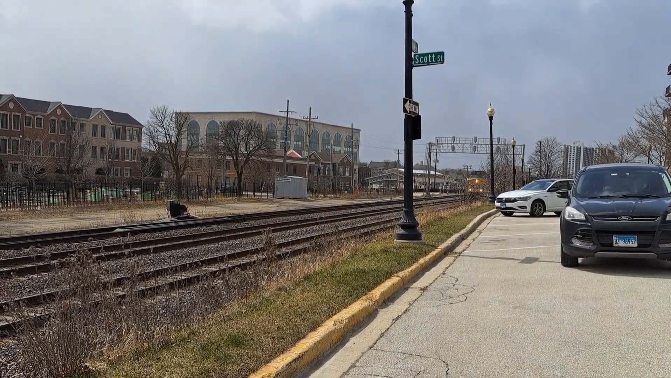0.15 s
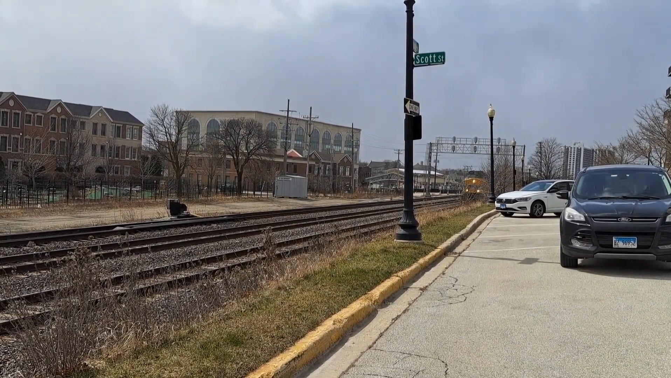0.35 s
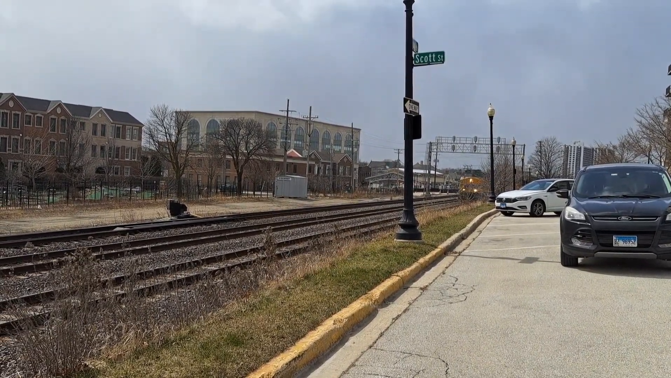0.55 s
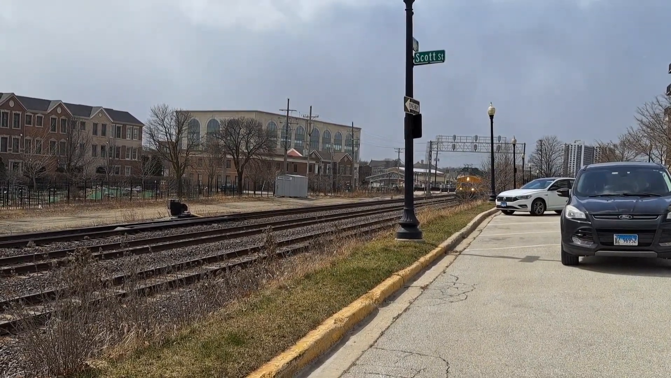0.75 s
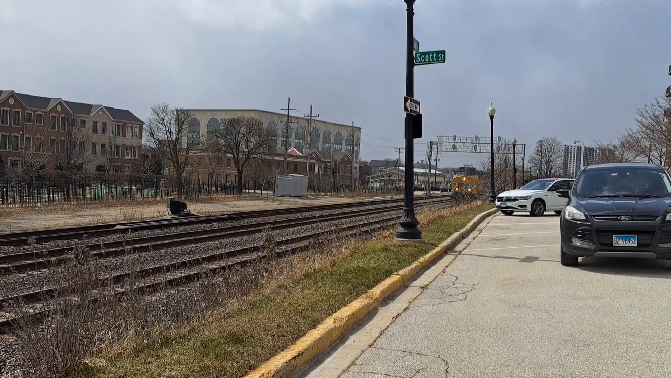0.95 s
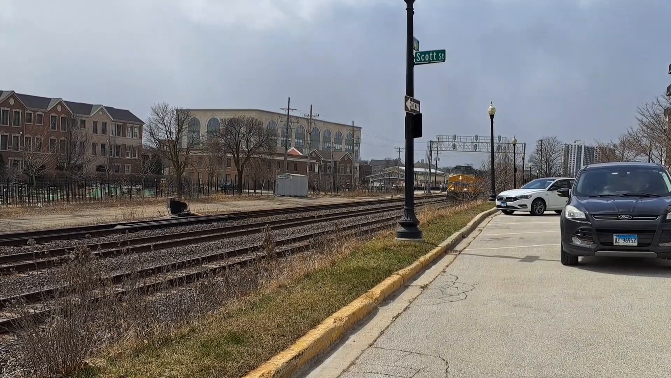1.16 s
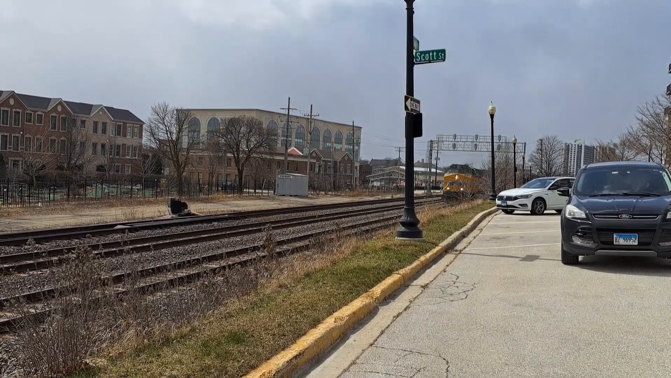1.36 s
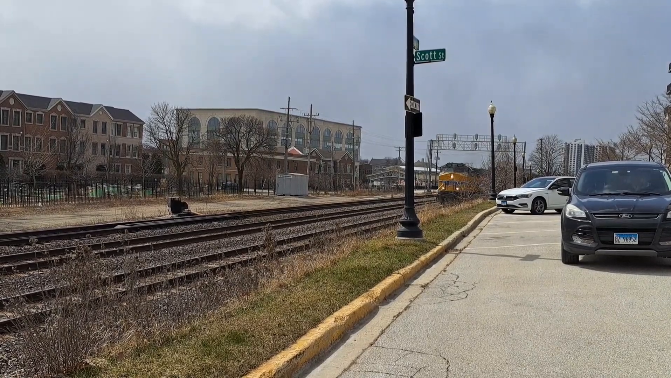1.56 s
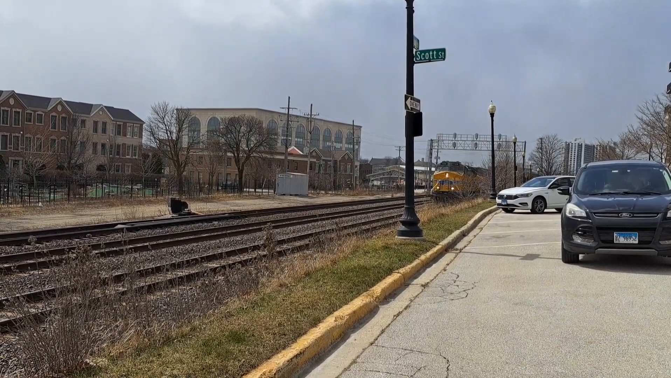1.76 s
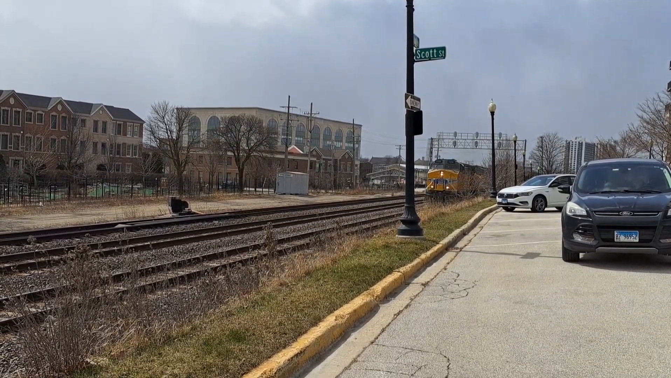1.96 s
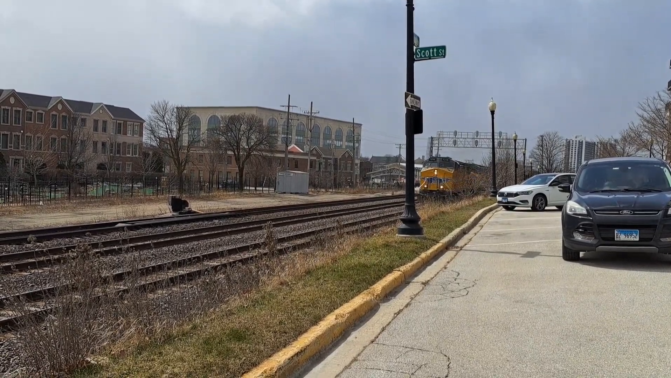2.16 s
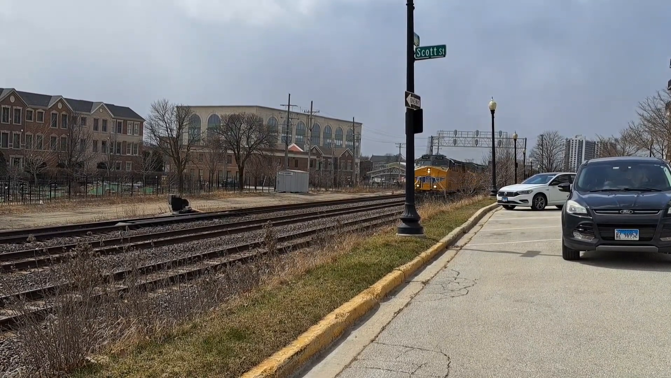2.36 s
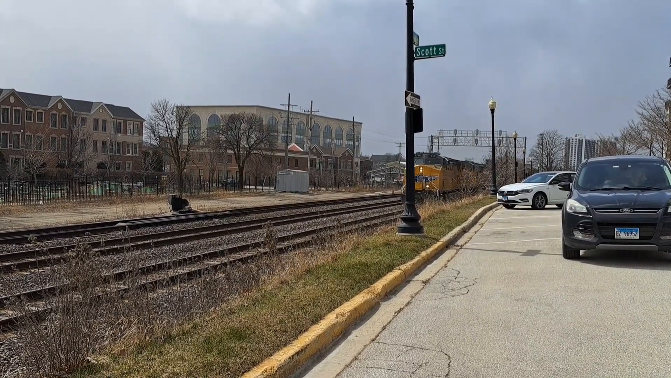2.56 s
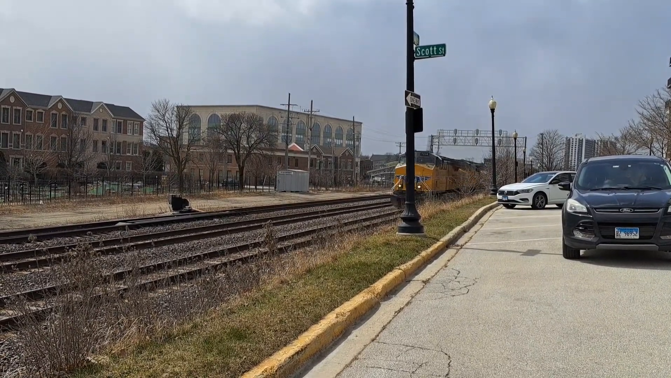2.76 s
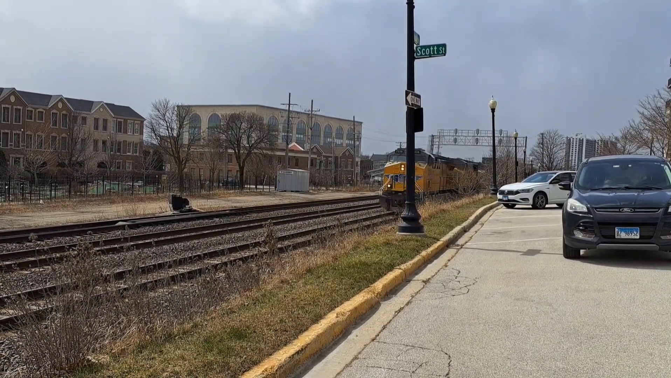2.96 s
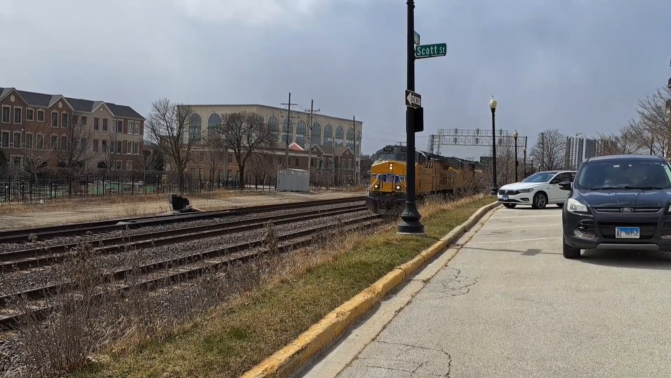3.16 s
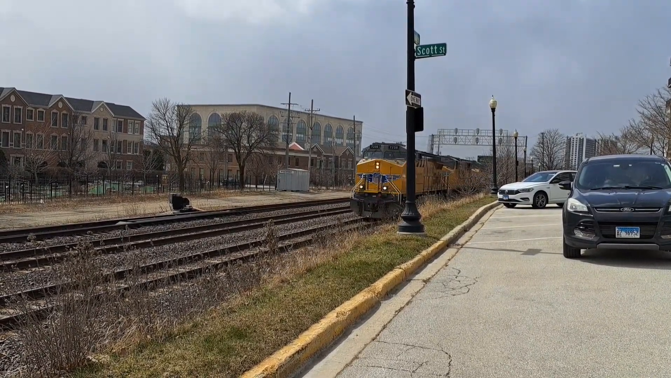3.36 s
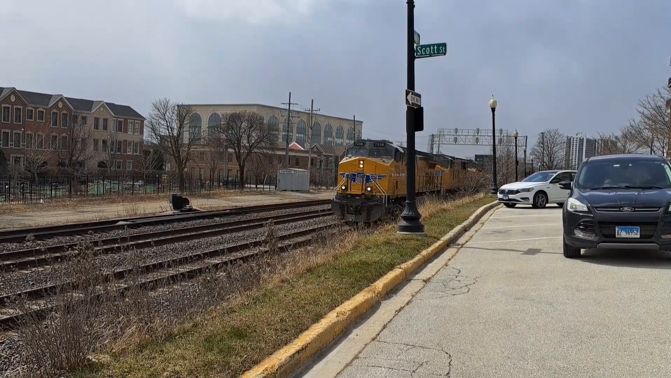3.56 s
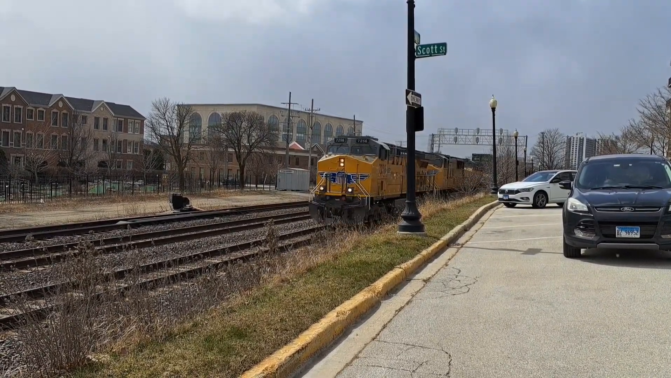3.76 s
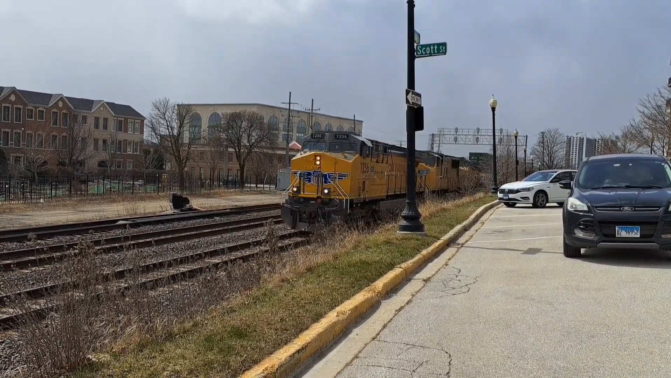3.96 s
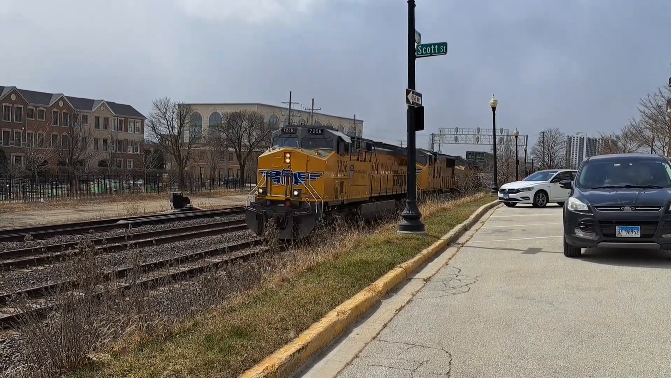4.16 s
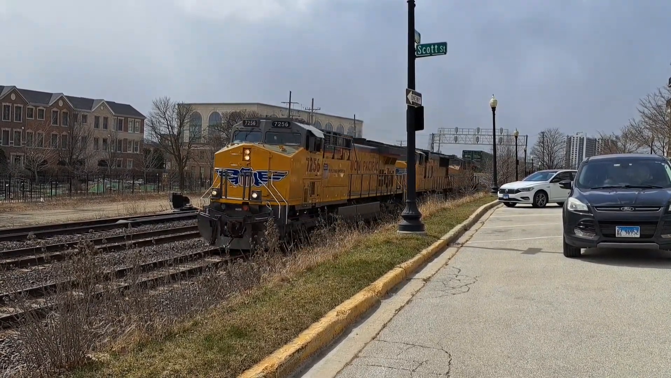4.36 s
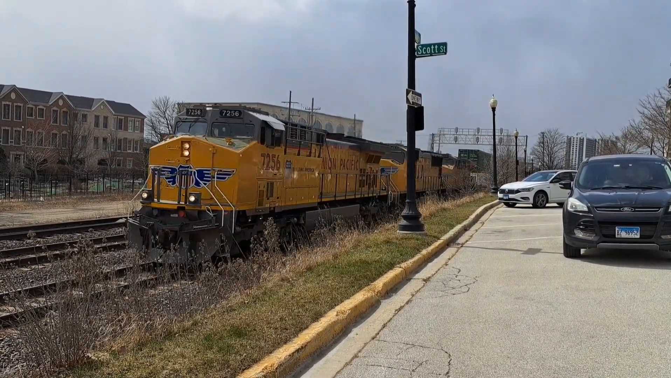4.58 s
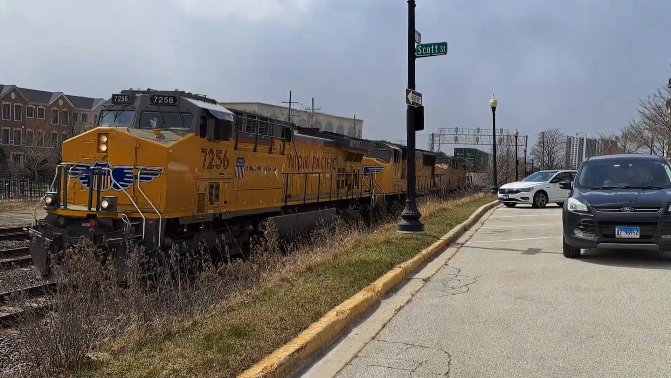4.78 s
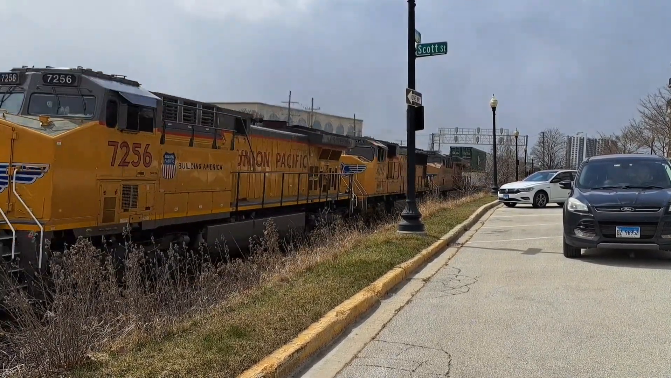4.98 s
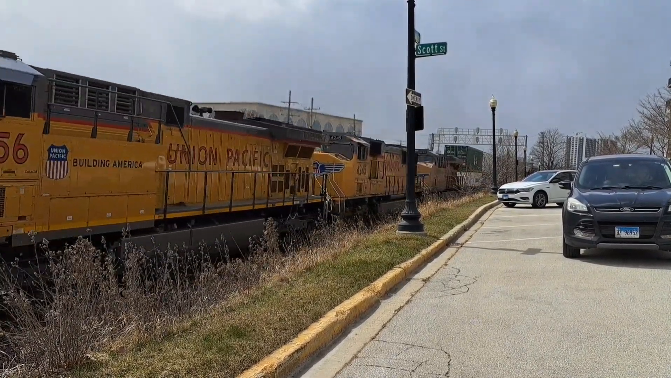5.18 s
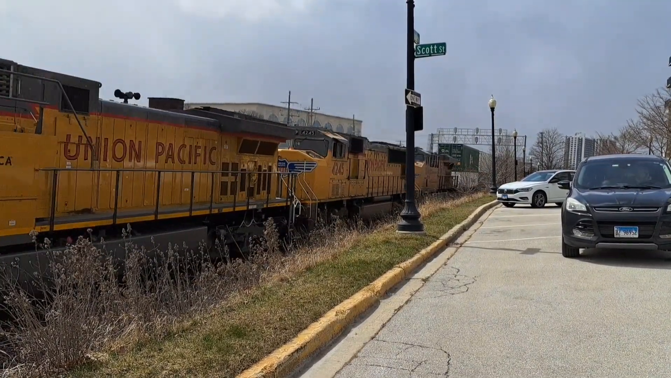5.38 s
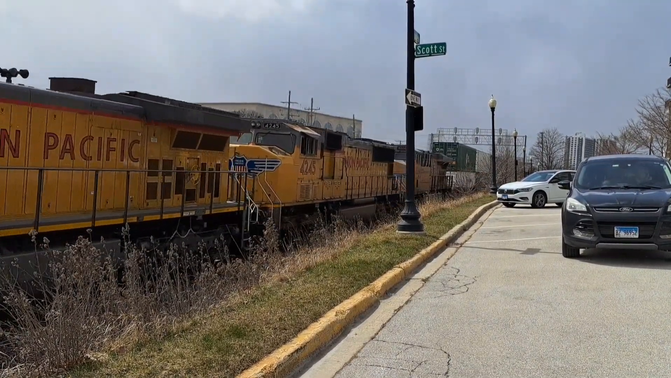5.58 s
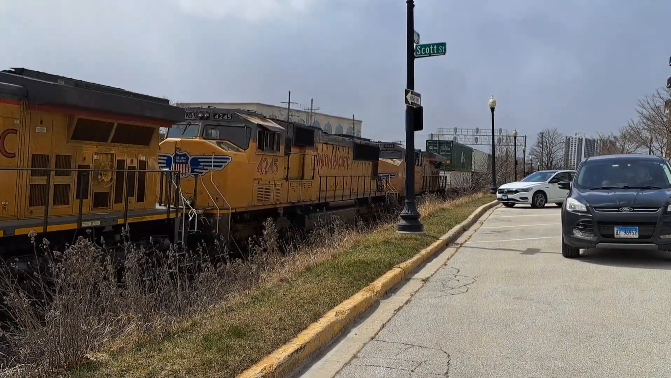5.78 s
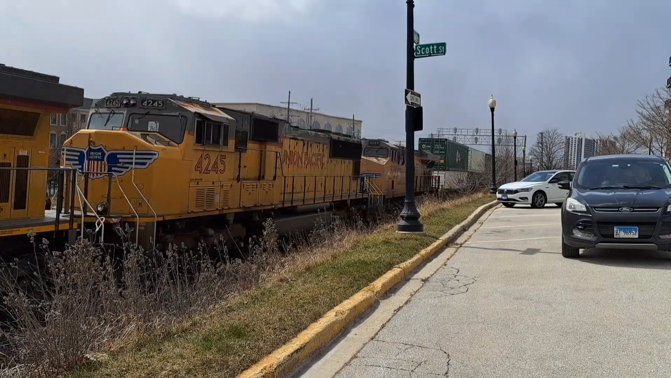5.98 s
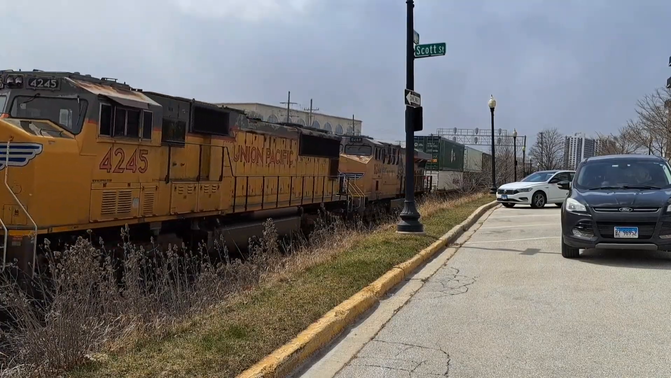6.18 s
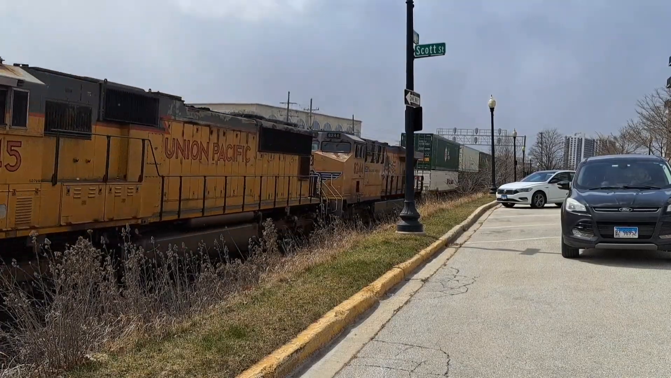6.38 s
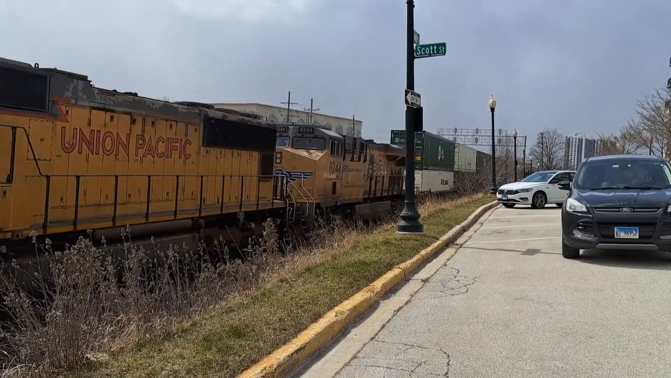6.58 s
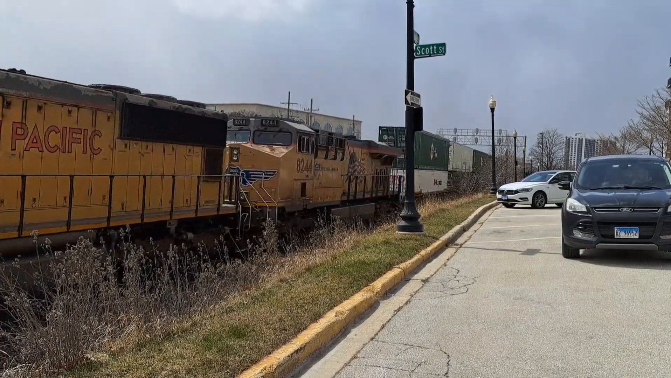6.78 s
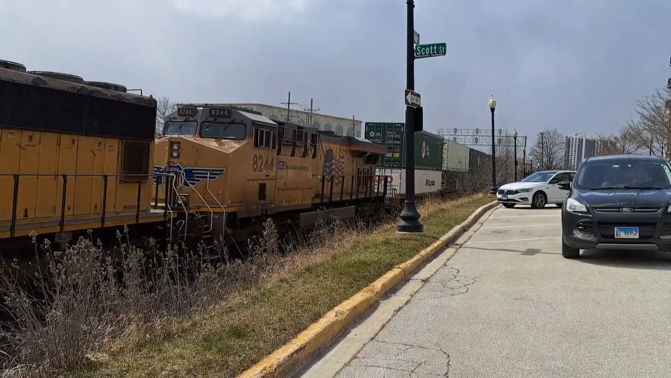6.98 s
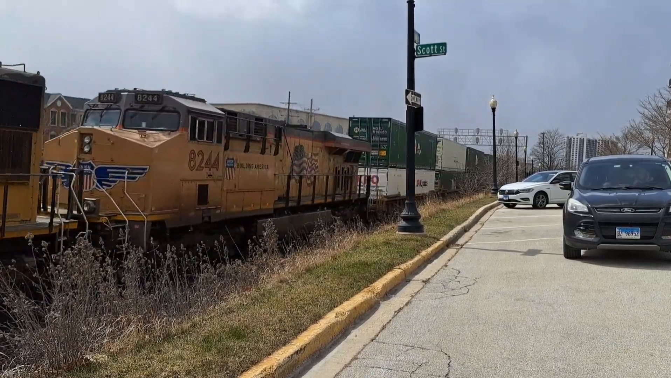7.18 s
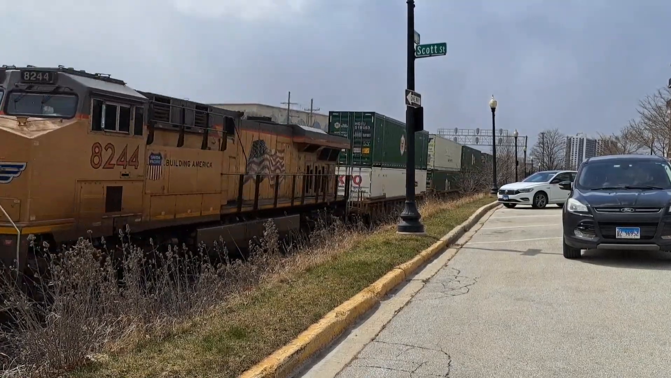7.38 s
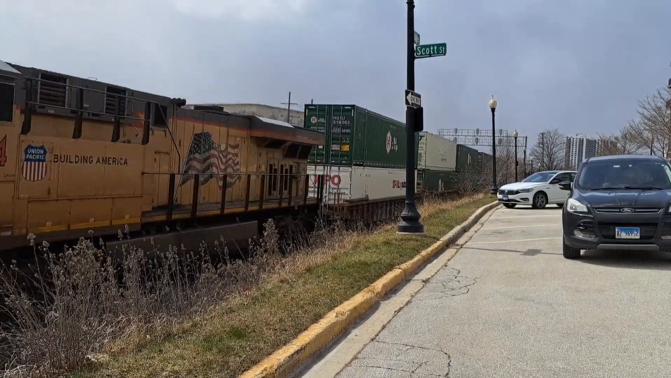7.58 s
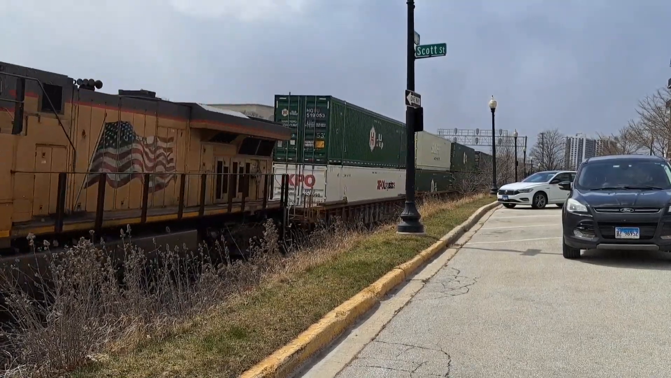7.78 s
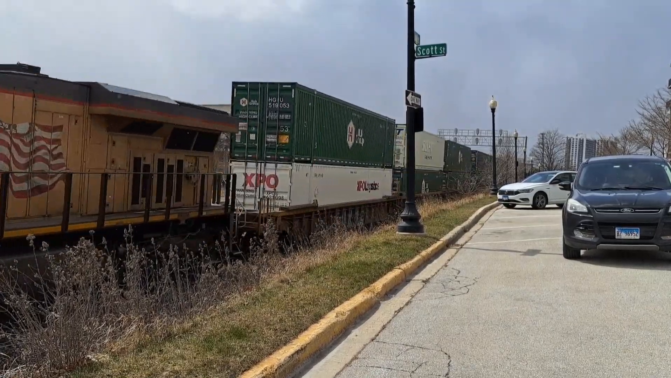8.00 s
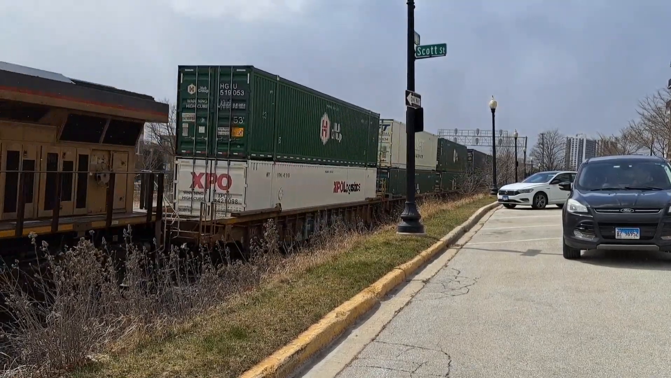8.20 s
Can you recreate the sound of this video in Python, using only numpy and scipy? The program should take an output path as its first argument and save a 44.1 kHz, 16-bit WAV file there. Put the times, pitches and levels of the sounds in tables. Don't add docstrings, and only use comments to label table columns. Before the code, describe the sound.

Gusty wind thuds on the microphone while a distant engine throb grows, then diesel locomotives roar past close by with whining gears and singing wheels.

```python
import sys
import numpy as np
from scipy import signal
from scipy.fft import rfft, irfft, next_fast_len
from scipy.io import wavfile
from scipy.ndimage import uniform_filter1d, map_coordinates

SR = 44100
rng = np.random.default_rng(int(sys.argv[2]) if len(sys.argv) > 2 else 0)


def put_to_file(sound):
    columns = np.atleast_2d(sound).T
    safe = np.clip(columns, -1, 1)
    whole_steps = np.round(safe * 32767)
    wavfile.write(sys.argv[1], SR, whole_steps.astype(np.int16))


def nominal_scale(level):
    x = np.asarray(level, float) / 20
    return 10 ** x


N = 363384
STEP = 40
TIME_S = np.arange(N) / SR
SLOW_TIME_S = np.arange(0, N, STEP) / SR
SPEED_MACH = 0.075
MISS_S = 0.8


def in_time(rows):
    s, *columns = np.transpose(rows)
    return [np.interp(TIME_S, s, column) for column in columns]


def at_hz(points, hz):
    point_hz, value = np.array(points).T
    return np.interp(np.log(hz), np.log(point_hz), value)


def every_sample(x):
    return np.interp(np.arange(N) / STEP, np.arange(len(x)), x)


def slow(rate):
    r = np.exp(-2 * STEP * np.pi * rate / SR)
    settle = 2000
    wander = signal.lfilter([1], [1, -2 * r, r * r], rng.standard_normal(N // STEP + 2 + settle))
    return rms_one(wander[settle:])[:-1]


def drift(rate):
    return every_sample(slow(rate))


def swell(s, length):
    t = np.arange(0, N + STEP, STEP) / SR
    return np.exp(-(2 * (t - s) / length) ** 2)


def rms_one(x):
    return x / np.sqrt(np.mean(x ** 2) + 1e-20)


def band(x, low_hz, high_hz):
    return signal.sosfilt(signal.butter(2, [low_hz, high_hz], "band", fs=SR, output="sos"), x)


def low_pass(order, edge_hz):
    return signal.butter(order, edge_hz, fs=SR, output="sos")


def pair(mid, side, hz):
    # pitch_hz, likeness (0 to 1)
    likeness = [(40, 0.75), (80, 0.94), (300, 0.97), (700, 0.66), (1200, 0.67), (2900, 0.43), (5000, 0.18),
                (15000, 0.06)]
    alike = np.clip(at_hz(likeness, hz), 0, 1)
    return np.sqrt(1 + alike) * mid + np.sqrt(1 - alike) * side * [[1], [-1]]


def port_gains(level_db, left_right_db):
    return nominal_scale(level_db + left_right_db * np.array([[0.5], [-0.5]]))


def guard_db():
    # middle_s, width_s, depth_db
    dips = [
        [(0.708, 0.027, 20), (0.857, 0.073, 19.5), (1.62, 0.014, 9), (1.931, 0.029, 19), (2.052, 0.04, 16),
         (2.803, 0.021, 36), (4.359, 0.02, 21)],
        [(0.204, 0.062, 34), (0.475, 0.039, 10), (0.572, 0.019, 22), (0.671, 0.018, 12), (0.958, 0.12, 16),
         (1.041, 0.018, 10), (1.427, 0.039, 20), (1.526, 0.018, 19), (1.621, 0.02, 23), (2.064, 0.081, 12),
         (2.727, 0.018, 19), (2.831, 0.076, 21), (2.907, 0.034, 24), (2.975, 0.057, 29), (3.07, 0.084, 19),
         (3.265, 0.049, 24), (3.31, 0.021, 24), (3.606, 0.075, 27), (3.719, 0.07, 19), (3.937, 0.058, 30),
         (4.362, 0.014, 15)],
    ]
    cut_db = np.zeros((2, N))
    for port, rows in enumerate(dips):
        for s, width, depth in rows:
            near = np.arange(max(round((s - width) * SR), 0), round((s + width) * SR))
            cut_db[port, near] -= depth * np.exp(-(2 * (near / SR - s) / width) ** 4)
    return cut_db


def wind():
    # middle_s, length_s, level_db, left_right_db
    gust_rows = [(0.158, 0.2, -26, -1), (0.469, 0.2, -15.5, 4), (0.637, 0.04, -20.5, 3),
                 (0.792, 0.037, -39, 8), (0.97, 0.22, -23, 5.5), (1.205, 0.22, -41, -1),
                 (1.458, 0.1, -23, -4), (2.3, 0.46, -37.5, -6), (2.746, 0.18, -27.5, -2),
                 (2.883, 0.09, -28, -10), (3.35, 0.17, -34, -4), (3.582, 0.21, -35, -19),
                 (3.85, 0.094, -29.5, -7), (4.114, 0.16, -39, -4.5)]
    gusts = sum(port_gains(db, pan_db) * swell(s, length) for s, length, db, pan_db in gust_rows)
    breeze = np.clip((5.04 - TIME_S) / 0.44, 0, 1)
    working_db = uniform_filter1d(np.minimum(-guard_db(), 20), round(0.1 * SR))
    lumps = nominal_scale(4.0 * np.array([drift(40.0), drift(38.0)]))
    grit = nominal_scale(3 * np.array([drift(60.0), drift(60.0)]))
    white = rng.standard_normal((2, N)) + 0.39 * rng.standard_normal(N)
    thuds = rms_one(band(band(white * lumps, 25, 244), 40, 1040)) * nominal_scale(0.5)
    thuds = thuds * (nominal_scale(-30) * breeze + [every_sample(gust) for gust in gusts])
    rustle = rms_one(band(band(white * grit, 464, 880), 440, 1620)) * nominal_scale(-50.5 + 1.29 * working_db)
    return thuds + rustle * breeze


def ticks():
    # start_s, peak_db, left_right_db
    scuffs = [(0.388, -34, 0.5), (0.438, -25, -6), (0.463, -15.5, -12), (0.624, -26.5, -8),
              (0.853, -26, -1.5), (0.949, -26, -3), (1.195, -37, 2.0), (1.436, -30, -4.0),
              (1.706, -34, -0.5), (2.007, -24.5, -8), (2.372, -27, -1.5), (2.538, -23, -0.5),
              (2.704, -26, -14), (2.79, -21, -6.0), (2.818, -21, -16), (2.863, -24, -8.0),
              (2.901, -25, -4.0), (3.08, -26, -8.0), (3.104, -23, -3.5), (3.143, -29, -7.0),
              (3.157, -29, 0), (3.314, -31, -6.5), (3.647, -34, -2.0), (3.91, -25, -15), (3.933, -36, -4.5)]
    size = 2048
    out, t = np.zeros((2, N + size)), np.arange(size) / SR
    for s, peak_db, pan_db in scuffs:
        grit = rng.standard_normal(size) * (1 - np.exp(-t / 0.00082)) * np.exp(-t / 0.002)
        tick = band(band(grit, 420, 1080), 320, 2200)
        i = round(s * SR)
        out[:, i:i + size] += tick / np.abs(tick).max() * port_gains(peak_db - 2, pan_db)
    return out[:, :N]


def membrane(t, hz, cycles, phase=0):
    age = t * hz / cycles
    return np.sin(2 * np.pi * hz * t + phase) * age * np.exp(1 - age)


def thumps():
    # start_s, peak_db, pitch_hz
    eddies = [(0.412, -10, 171), (0.526, -12.5, 149), (0.776, -19, 95), (0.798, -13.5, 85.4),
              (0.893, -19, 170), (1.178, -13, 120), (1.24, -14, 141), (1.487, -12, 194), (2.155, -19, 181),
              (2.768, -8, 95), (2.876, -14.5, 140), (2.933, -12, 105), (3.13, -19, 80), (3.186, -14.5, 90),
              (3.677, -15, 75), (3.772, -17, 84), (3.8, -11, 101), (3.88, -13, 90), (4.036, -20.5, 270),
              (4.077, -11.5, 89.5), (4.195, -15, 210)]
    size = 4096
    out, t = np.zeros(N + size), np.arange(size) / SR
    for s, peak_db, hz in eddies:
        i = round(s * SR)
        out[i:i + size] -= nominal_scale(peak_db) * membrane(t, hz, cycles=0.53)
    return out[:N]


def buffets():
    # start_s, peak_db, left_right_db, crack_db
    hits = [(0.418, -17, -6.5, -40), (0.438, -16, -8.5, -26),
            (0.464, -26, -8, -17) , (0.504, -8.5, -2, -50), (0.513, -17, -7, -45), (0.528, -15, -3.5, -36),
            (0.548, -14.5, 3.5, -45), (0.617, -11.5, -8, -44), (0.624, -20, -7.5, -22),
            (0.639, -17, 9, -44), (0.854, -19, -6.5, -34), (0.918, -20, -13, -9.5), (0.951, -18, 9, -32),
            (0.988, -19, 9, -45), (1.193, -32, 2, -29), (1.4, -16.5, -5.5, -27), (1.436, -20.5, -12, -35),
            (1.708, -31, -1.0, -17), (1.858, -30, 3.5, -10), (2.372, -31, -3.5, -24),
            (2.815, -17, -10.5, -17), (2.876, -15, -2, -32), (2.949, -20, -11.5, -20),
            (3.142, -33, 0.5, -24), (3.304, -23, -9.5, -27)]
    size = 2048
    out, t = np.zeros((2, N + size)), np.arange(size) / SR
    for s, peak_db, pan_db, crack_db in hits:
        hz = 197 + 20 * abs(pan_db)
        rock = membrane(t, hz, cycles=0.61, phase=np.pi + rng.uniform(-1.0, 0.61, (2, 1)))
        crack = band(rng.standard_normal((1, size)) * t * np.exp(-t / 0.0019), 650, 2800)
        crack = signal.lfilter([1], [1, -0.9], crack)
        crack = crack / np.abs(crack).max(axis=1, keepdims=True)
        i = round(s * SR)
        out[:, i:i + size] += (rock + nominal_scale(crack_db + 5.5) * crack) * port_gains(peak_db + 0.5, pan_db)
    return out[:, :N]


def roar():
    handover_hz = (140, 1150, 8000)
    # pitch_hz, level_db (per Hz)
    near_colour = [(21, -40), (35, -26), (61, -0.5), (97, -0.5), (166, -13.5), (220, -13.5), (307, -16.5),
                   (474, -22.5), (661, -26.5), (969, -32.5), (1190, -39), (1840, -38.5), (2760, -43),
                   (8080, -47), (15700, -50.5)]
    # pitch_hz, level_db (per Hz)
    far_colour = [(21, -37), (35, 3.5), (60, 2.5), (90, -4), (166, -6), (512, -21.5), (811, -14.5),
                  (994, -19.5), (1320, -35), (1880, -37), (2760, -53.5), (4270, -49), (10200, -66),
                  (14500, -62), (15700, -76)]
    # time_s, nearness (0 far to 1 close)
    nearness = [(0, 0.015), (4.2, 0.37), (4.9, 0.77), (5.4, 0.81), (8.24, 0.97)]
    # time_s, level_db
    loudness = [(0.0, -44.5), (0.27, -49), (0.6, -56), (1.1, -54.5), (2.02, -51.5), (2.61, -44.5),
                (3.26, -48), (4.08, -45), (4.36, -40.5), (4.6, -38), (4.8, -35), (5.1, -32), (5.51, -30.5),
                (6.56, -31.5), (6.82, -33), (7.14, -33.5), (7.41, -36.5), (8.24, -35)]
    # abreast_db, share of the loudness swing, gained_db from far to close
    part_rows = [
        (-19, 0.3, -2.5),
        (-22.5, 0.79, 0.85),
        (-27.5, 0.86, 0.42),
        (-35.5, 1.46, -3.5),
    ]
    trims_db = (-1.5, 0.1, -1.5, 0.1)

    near = np.clip(in_time(nearness)[0], 0, 1)
    swing_db = in_time(loudness)[0] + 31
    parts, power = np.zeros((4, 2, N)), np.zeros((4, N))
    white = rng.standard_normal((2, 2, N))
    together = 1 + 0.14 * drift(63.0)
    edges = 35 * 2 ** np.arange(0, 9.1, 0.5)
    for k, (low, high) in enumerate(zip(edges, edges[1:])):
        hz = np.sqrt(low * high)
        part = np.searchsorted(handover_hz, hz)
        gain = near * nominal_scale(at_hz(near_colour, hz)) + (1 - near) * nominal_scale(at_hz(far_colour, hz))
        power[part] += gain ** 2 * (high - low) * 4 / SR
        flicker = together + 0.18 * drift(16.2)
        parts[part] += gain * flicker * pair(*band(white[k % 2], low, high), hz)
    out = np.zeros((2, N))
    for k, (abreast_db, share, gained_db) in enumerate(part_rows):
        level_db = abreast_db + share * swing_db + gained_db * near
        out += nominal_scale(level_db + trims_db[k]) * parts[k] / np.sqrt(power[k])
    return out


def noise_swells(rows):
    out = np.zeros((2, N))
    for s, length, hz, width_hz, level_db in rows:
        size = round(2 * length * SR)
        white = rng.standard_normal((2, 2 * SR))[:, :size]
        noise = pair(*band(white, hz - width_hz / 2, hz + width_hz / 2), hz)
        i = max(round(s * SR) - size // 2, 0)
        out[:, i:i + size] += (nominal_scale(level_db) * rms_one(noise) * np.hanning(size))[:, :N - i]
    return out


def squeals():
    # middle_s, length_s, pitch_hz, width_hz, level_db
    rows = [(.19, 0.25, 10000, 8000, -55.5), (0.75, .5, 11300, 300, -68), (2.45, .5, 11300, 300, -66),
            (.09, .1, 14500, 300, -66), (1.8, .15, 14500, 200, -69), (4.3, .08, 14500, 250, -60),
            (4.5, .06, 14800, 400, -59), (5.26, 0.14, 161, 27, -27), (6.53, .12, 157, 31, -25.5),
            (5.64, .04, 6000, 500, -44), (7.9, .05, 3400, 400, -45), (5.53, 0.16, 2580, 210, -38),
            (1.19, .012, 12000, 5000, -50), (1.85, .2, 11300, 300, -62), (3.69, .25, 14500, 200, -60),
            (4.25, 0.5, 4600, 850, -48.5), (4.621, .1, 15500, 403, -54), (4.71, 0.09, 5360, 300, -38),
            (4.85, 0.3, 3000, 2500, -36), (4.95, 0.22, 1950, 260, -41), (5.447, .4, 756, 230, -30),
            (6.499, 0.46, 3450, 530, -40), (4.803, 0.04, 6100, 3300, -33.5), (6.73, 0.11, 8650, 210, -35.5),
            (1.6, .42, 1780, 270, -52), (2.25, .42, 1850, 350, -48.5), (8.19, 0.09, 7900, 300, -35.5),
            (4.28, 0.3, 1660, 24, -42), (7.15, 0.04, 6750, 600, -44), (7.36, 0.28, 5280, 240, -43),
            (7.9, 0.098, 4900, 520, -48), (4.9, 0.35, 1180, 130, -36.5), (7.7, 0.1, 2900, 200, -44)]
    return noise_swells(rows)


def grinds():
    # middle_s, length_s, pitch_hz, width_hz, level_db
    rows = [(0.921, .006, 3300, 3200, -47), (3.851, .4, 1950, 300, -51), (4.93, .14, 98, 30, -20),
            (5.703, 0.36, 2040, 260, -48), (6.448, 0.4, 1960, 240, -40.5), (7.141, 0.089, 2220, 600, -33.5),
            (7.2, 0.09, 2630, 700, -30), (7.3, 0.067, 2400, 500, -33), (7.18, 0.057, 4200, 500, -37),
            (4.72, 0.095, 2670, 700, -37.5), (4.9, 0.16, 2020, 250, -36.5), (5.4, 0.41, 1850, 120, -40),
            (5.7, .15, 1490, 90, -40), (6.0, 0.15, 1450, 70, -44), (6.6, 0.25, 3700, 700, -39),
            (7.12, .2, 8330, 300, -40), (5.95, 0.28, 310, 89, -29.5), (8.12, .1, 195, 40, -28.5)]
    return noise_swells(rows)


def whines():
    # middle_s, length_s, pitch_hz, width_hz, level_db
    rows = [(0.464, .006, 3300, 2500, -46), (4.35, .3, 1570, 30, -46), (4.68, .18, 1370, 30, -42),
            (4.7, .2, 1860, 30, -41), (5.25, .25, 1230, 260, -39), (5.35, .25, 1450, 300, -39),
            (5.65, .5, 13500, 4000, -47), (5.9, .25, 1445, 30, -40), (6.08, .03, 9500, 7000, -41),
            (6.1, .12, 1050, 40, -35), (6.21, .03, 8000, 6000, -39), (6.4, .15, 2560, 50, -43),
            (6.65, .2, 5400, 300, -46), (7.1, .05, 4600, 400, -44), (8.07, .07, 1430, 40, -40),
            (7.9, .35, 1900, 60, -46), (7.5, .2, 1480, 40, -46), (3.5, .25, 1900, 200, -50),
            (3.2, .5, 990, 260, -43), (5.15, .2, 1870, 60, -38), (5.6, .3, 1045, 40, -37),
            (4.15, .2, 2050, 400, -48), (4.62, .06, 15000, 1400, -52), (5.2, .4, 5450, 200, -49),
            (2.74, .07, 900, 700, -38)]
    return noise_swells(rows)


def narrow(rows, width_hz, trim_db):
    hz, level_db = in_time(rows)
    lows = signal.sosfilt(low_pass(3, width_hz / 2), rng.standard_normal((4, N)))
    turn = 2 * np.pi * np.cumsum(hz) / SR
    mid, side = lows[:2] * np.cos(turn) + lows[2:] * np.sin(turn)
    outside_s = np.minimum(TIME_S - rows[0][0], rows[-1][0] - TIME_S)
    sounding = np.clip(1 + outside_s / 0.065, 0, 1)
    return nominal_scale(level_db + trim_db) * sounding * rms_one(pair(mid, side, hz.mean()))


def tone(hz, level_db, wander, flutter_db, rate):
    turn = 2 * np.pi * STEP * np.cumsum(hz) / SR + wander * slow(rate) + rng.uniform(0, 7)
    level = np.sqrt(2) * nominal_scale(level_db + flutter_db * slow(rate))
    return every_sample(level) * np.sin(every_sample(turn))


def shifted(hz, ahead_s):
    return hz * (1 + SPEED_MACH * ahead_s / np.hypot(ahead_s, MISS_S))


def passing(abreast_s, early_s, hz, level_db):
    ahead_s = abreast_s - SLOW_TIME_S
    distance_db = -20.4 * np.log10(1 + ((ahead_s - early_s) / MISS_S) ** 2)
    return tone(shifted(hz, ahead_s), level_db + distance_db, wander=0.45 + hz / 2800, flutter_db=3, rate=11)


def turbocharger():
    t = np.linspace(6.68, N / SR, 40)
    ahead_s, turnover_s = 7.25 - t, 0.3
    hz = 8260 * (1 + 0.042 * ahead_s / np.hypot(ahead_s, turnover_s))
    level_db = -36.5 - 10 * ahead_s - 17 * np.log10(1 + (ahead_s / turnover_s) ** 2)
    return narrow(np.c_[t, hz, level_db], width_hz=400, trim_db=-1) * nominal_scale(2.2 * drift(20.0))


def singing():
    # time_s, pitch_hz, level_db
    song = [(0.0, 991, -35.5), (0.5, 960, -41.5), (1.0, 990, -45.5), (1.7, 975, -41), (2.55, 979, -33),
            (2.9, 965, -39.5), (3.97, 1036, -41), (4.77, 1034, -30.5), (5.39, 1010, -23.5),
            (6.05, 1003, -29.5), (6.3, 975, -31.5), (6.95, 940, -29), (7.37, 942, -36.5), (7.6, 939, -24.5),
            (7.87, 965, -26), (8.24, 965, -31)]
    # abreast_s, early_s (loudest this long before), pitch_hz (at rest), level_db
    single_tones = [
        (6.3, -.45, 970, -32),
        (6.2, -.8, 478, -35),
        (6.85, 2.3, 1472, -48),
        (6.6, 1.2, 2420, -49),
        (7.2, .7, 1440, -43),
    ]
    return narrow(song, width_hz=105, trim_db=-1.0) + sum(passing(*row) for row in single_tones)


def gears():
    # abreast_s, early_s (loudest this long before), level_db
    wheel_sets = [
        (5.871, 0.054, 2.5),
        (6.852, 0.41, -2),
        (7.847, 0.034, -15),
    ]
    # abreast_s, early_s, pitch_hz (at rest), level_db
    motors = [
        (5.95, 1.6, 1546, -48),
        (5.95, 1.2, 1288, -48),
        (6.6, 1.5, 1742, -40.5),
        (6.6, .1, 1745, -43),
        (6.6, .2, 2495, -44),
        (8.5, .5, 2330, -49),
        (9.0, .9, 1800, -47),
        (10.2, 2.25, 930, -30),
        (9.2, 1.2, 455, -37),
    ]
    tooth_hz = 485.6
    out = sum(passing(*row) for row in motors)
    for abreast_s, early_s, set_db in wheel_sets:
        for multiple, level_db in [(1, -33.5), (2, -30.5), (3, -40.5)]:
            out += passing(abreast_s, early_s, multiple * tooth_hz, set_db + level_db)
    return out


def exhaust():
    # time_s, pitch_hz
    firing = [(0, 78.44), (5.3, 78.6), (5.6, 79.9), (6.5, 79.5), (7.0, 78.1), (7.5, 74.73), (8.24, 71.13)]
    # middle_s, length_s, level_db
    throbs = [(0.01, 0.41, -17.5), (0.808, 0.044, -29), (1.173, 0.3, -18.5), (1.678, 0.048, -19),
              (1.885, 0.093, -27.5), (2.22, 0.16, -15.5), (2.667, 0.33, -16), (3.153, 0.57, -25.5),
              (3.707, 0.19, -19.5), (4.16, 0.072, -13.5), (4.518, 0.16, -12.5), (4.861, 0.076, -19),
              (5.22, 0.2, -11.5), (5.813, 0.49, -14), (6.756, 0.68, -14.5), (7.153, 0.3, -14),
              (7.523, 0.16, -8.5), (7.86, 0.21, -11.5), (8.23, 0.095, -7.5)]
    # abreast_s, loudest_s, spread_s, pitch_hz (at rest), level_db
    others = [
        (4.3, 0.04, 0.14, 107.0, -21.5),
        (6.5, 5.95, 0.71, 88.5, -19.5),
        (8.8, 9.2, 0.77, 87.4, -17),
        (6.4, 6, 0.85, 107.5, -25.5),
        (9.97, 8.17, 0.96, 109, -16.5),
        (9.8, 6.96, 0.86, 204.5, -27),
        (7.6, 6.76, 0.46, 66, -21.5),
        (8.7, 8.4, 0.77, 130, -27),
        (13, 9.3, 0.14, 65, -31),
    ]
    level = nominal_scale(-35.5) + sum(nominal_scale(db) * swell(s, 1.34 * length) for s, length, db in throbs)
    level_db = 20 * np.log10(level[:len(SLOW_TIME_S)]) - 3.0
    out = tone(in_time(firing)[0][::STEP], level_db, wander=0.089, flutter_db=-0.5, rate=6.9)
    for abreast, loudest, spread, hz, db in others:
        level_db = db - 12 * np.log10(1 + ((SLOW_TIME_S - loudest) / spread) ** 2)
        out += tone(shifted(hz, abreast - SLOW_TIME_S), level_db, wander=0.3, flutter_db=1.6, rate=7)
    return out


def spectrum_hz():
    size = next_fast_len(N + 4096)
    return size, np.arange(1, size // 2 + 2) * SR / size


def arrive(x):
    # time_s, lead_ms
    lead = [(0, 0.26), (4.2, 0.25), (5.0, 0.28), (5.6, 0.501), (8.24, 0.48)]
    # time_s, lead_ms, share straight from one spot
    treble_lead = [(0, .25, 0), (1.2, .25, 0), (1.5, .5, 0), (3.9, .5, 0), (4.1, .55, .25), (4.52, .55, .3),
                   (4.64, .07, .45), (5.1, .08, .45), (5.5, .14, .3), (5.62, .49, 0), (8.24, .475, 0)]
    # pitch_hz, share of the short-wave path
    treble_from = [(1400, 0), (1700, 1)]
    # pitch_hz, turn (radians)
    port_turn = [(80, 0.1), (260, 0.43), (900, 0.52), (2500, .05)]
    size, hz = spectrum_hz()

    def late(v, ms):
        moved = map_coordinates(v, [np.arange(N) - ms * SR / 1000], order=2, mode="nearest")
        return rfft(moved, size)

    left, right = x
    treble_ms, spot = in_time(treble_lead)
    long = late(right, in_time(lead)[0])
    short = late((right + spot * left) / np.sqrt(1 + spot ** 2 + 0.6 * spot), treble_ms)
    share = at_hz(treble_from, hz) * np.pi / 2
    mixed = np.cos(share) * long + np.sin(share) * short
    right = irfft(mixed * np.exp(1j * at_hz(port_turn, hz)), size)[:N]
    return np.array([left, right]) * port_gains(0, -0.6)


def scene():
    air = wind() + ticks() + thumps() + buffets()
    train = roar() + squeals() + grinds() + whines() + turbocharger() + singing() + gears() + exhaust()
    return air + arrive(train)


def bass_cut(x):
    bass = signal.sosfiltfilt(low_pass(4, 290), x)
    return x + (nominal_scale(guard_db()) - 1) * bass


def top_cut(x):
    return signal.sosfilt(signal.butter(12, 15820, fs=SR, output="sos"), x)


def record(dry):
    # pitch_hz, level_db
    colour = [(1200, 0.68), (2500, 0), (2800, -1), (5300, -1), (5700, -4), (8800, -4), (9200, -5),
              (10900, -4.5), (11300, -3), (15000, 0), (15700, -6)]
    # pitch_hz, level_db
    balance = [(100, 0.7), (500, -1.0), (2000, -0.25), (12000, 0.3)]
    x = dry + nominal_scale(-55.5) * band(rng.standard_normal((2, N)), 2700, 18000)
    x = x * np.minimum(np.arange(N) / 200, 1)
    size, hz = spectrum_hz()
    x = irfft(rfft(x, size) * port_gains(at_hz(colour, hz), at_hz(balance, hz)), size)[:, :N]
    x = 1.064 * np.tanh(bass_cut(x) / 1.117)
    x = signal.sosfilt(signal.butter(2, 38, "high", fs=SR, output="sos"), x)
    return top_cut(x)


dry = scene()
out = record(dry)
put_to_file(out)
```